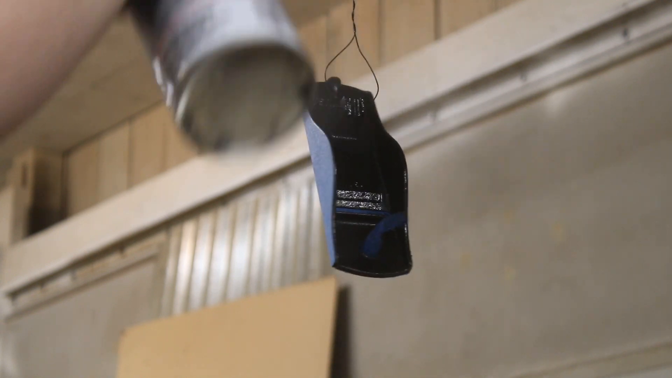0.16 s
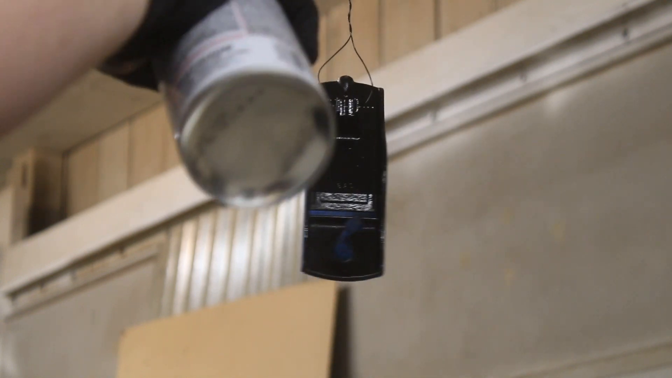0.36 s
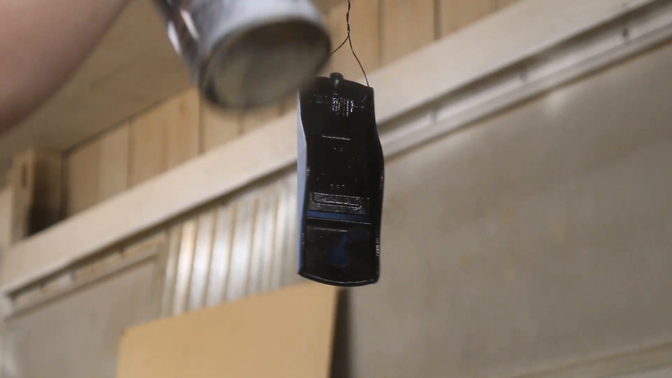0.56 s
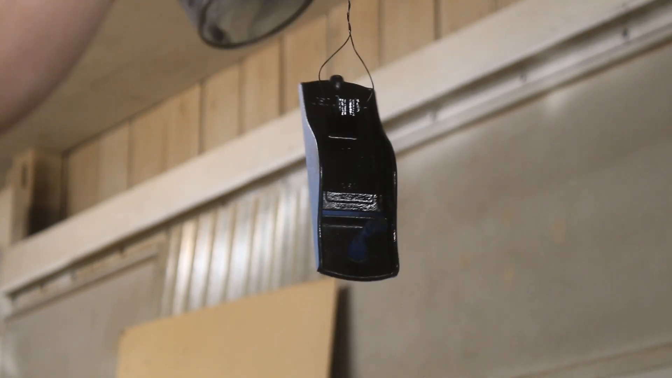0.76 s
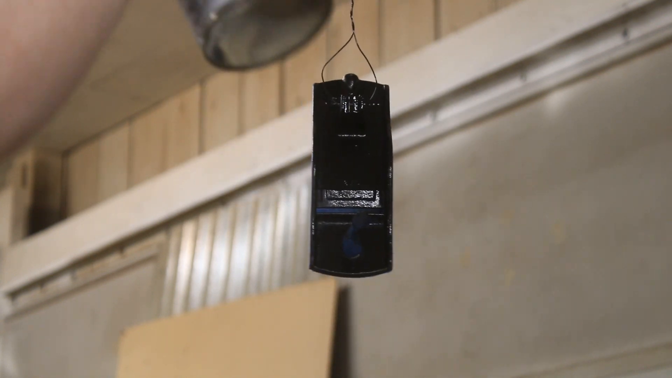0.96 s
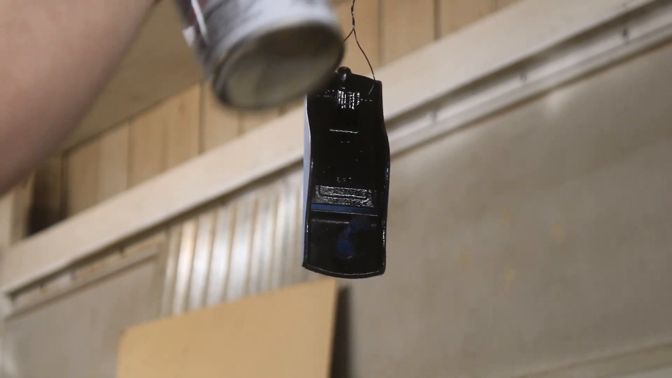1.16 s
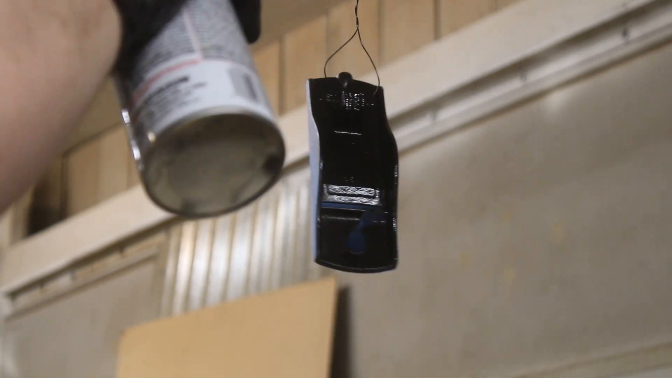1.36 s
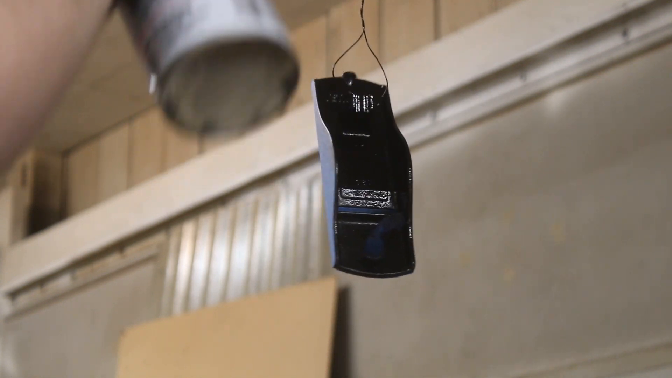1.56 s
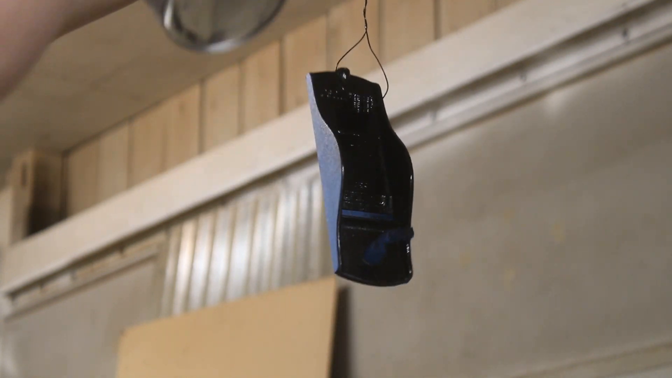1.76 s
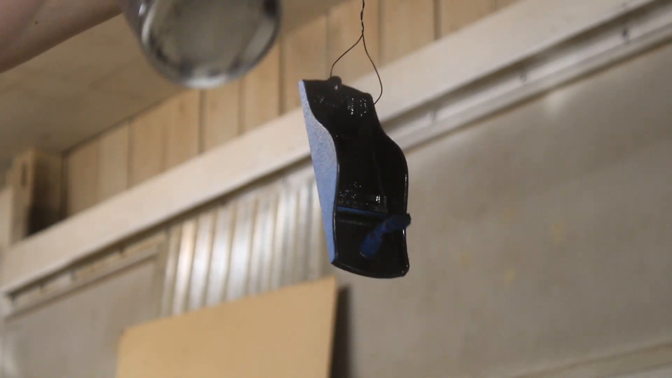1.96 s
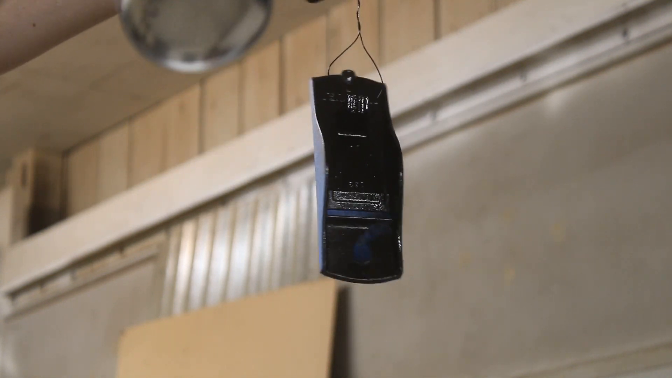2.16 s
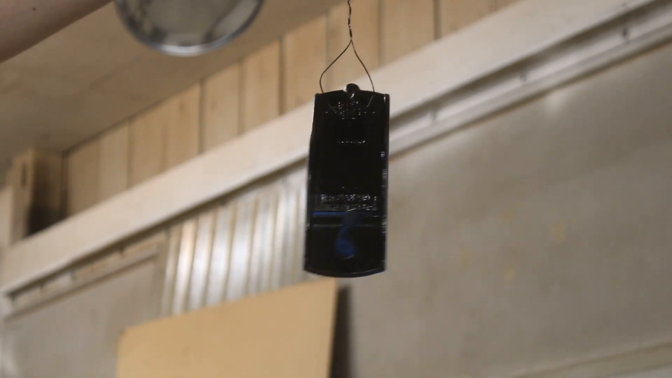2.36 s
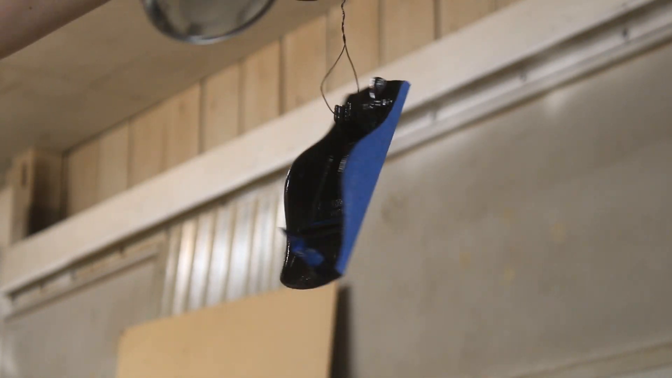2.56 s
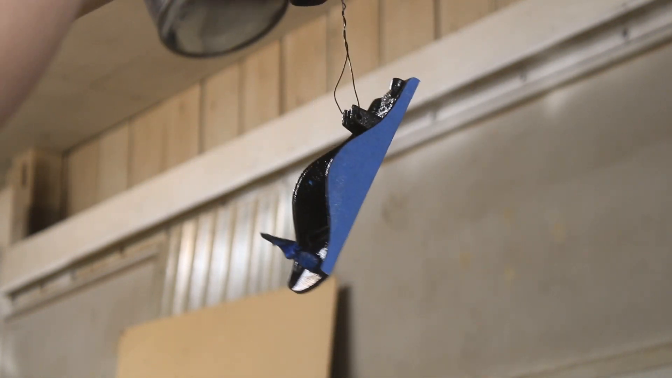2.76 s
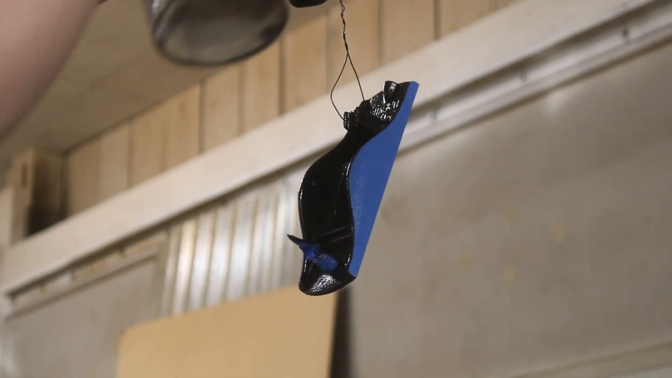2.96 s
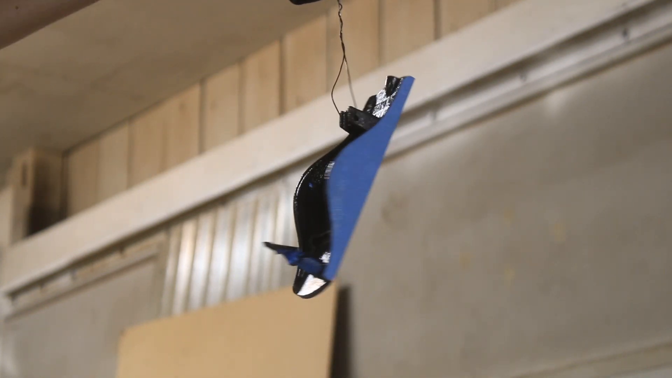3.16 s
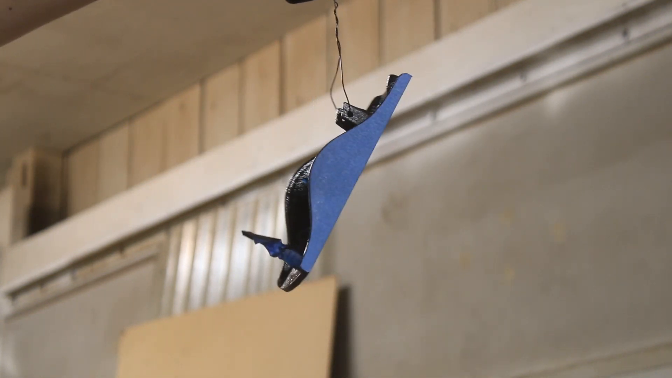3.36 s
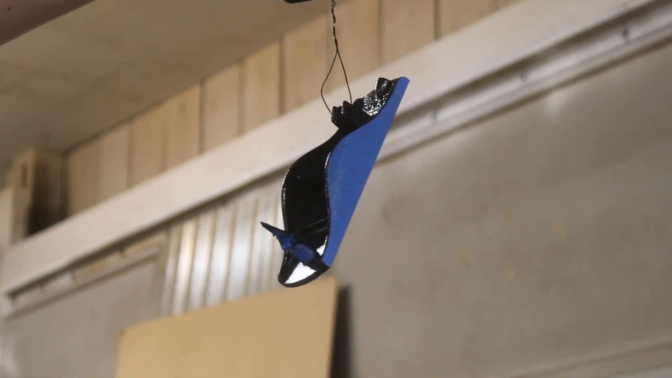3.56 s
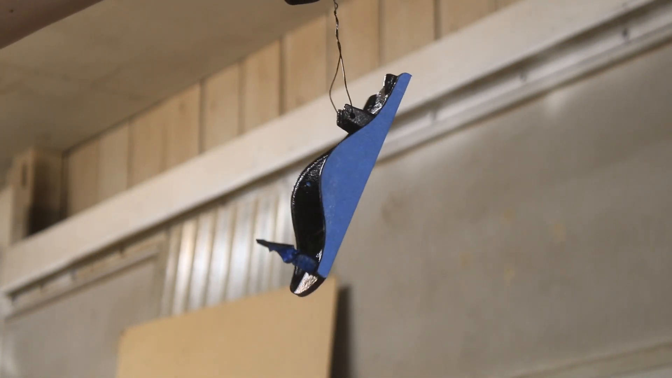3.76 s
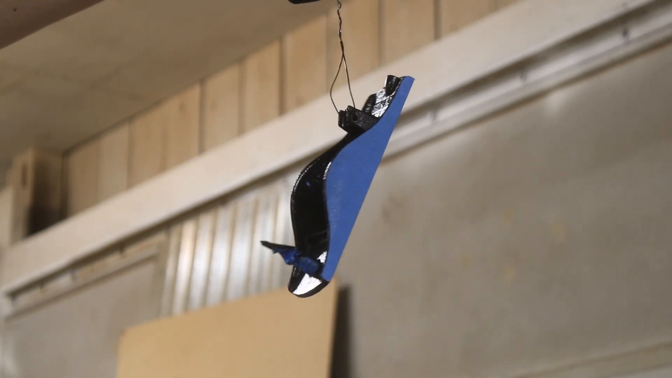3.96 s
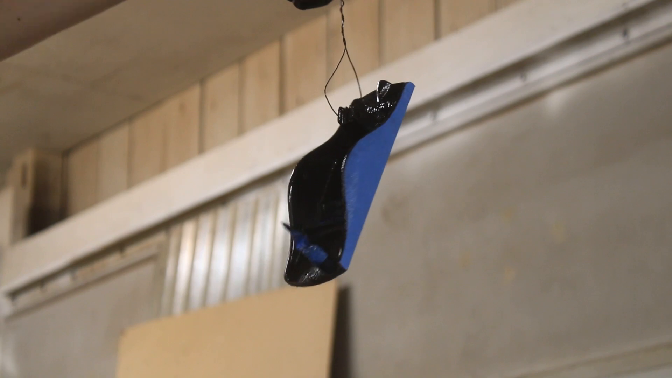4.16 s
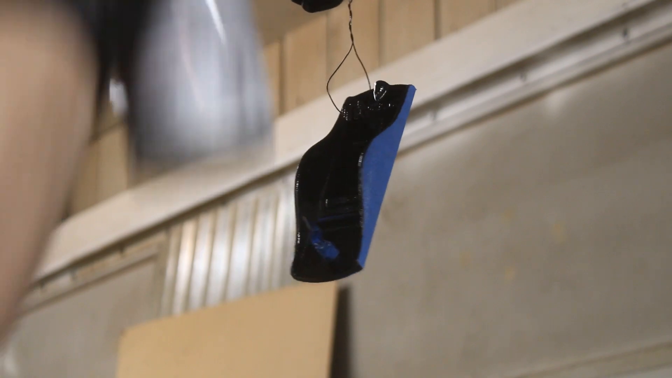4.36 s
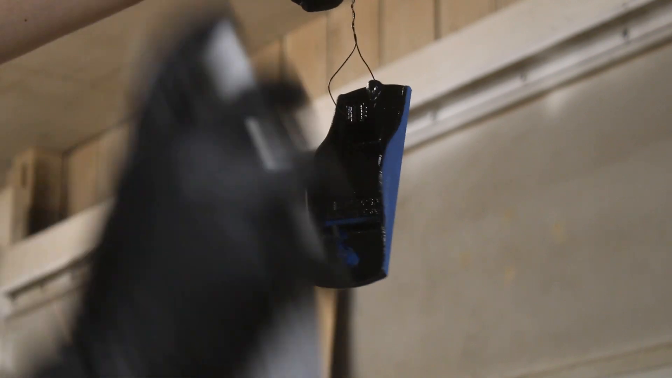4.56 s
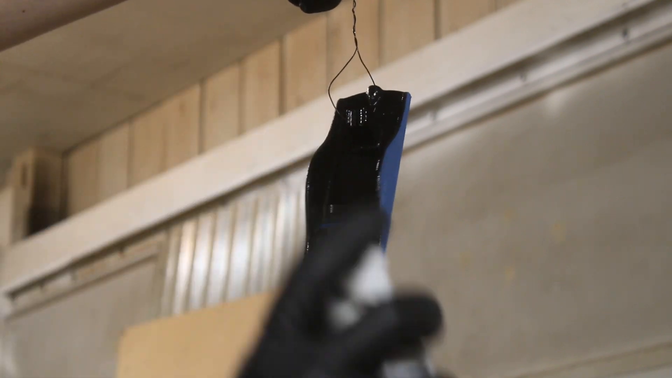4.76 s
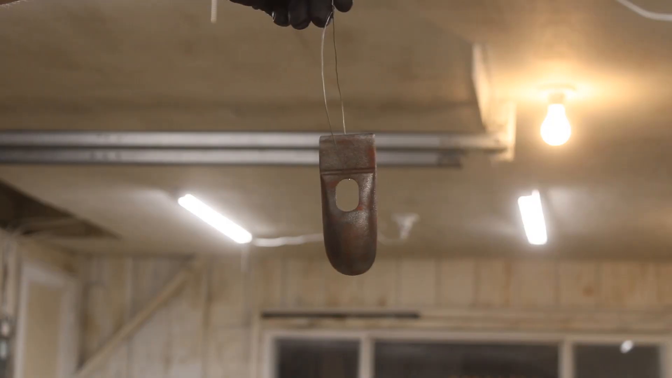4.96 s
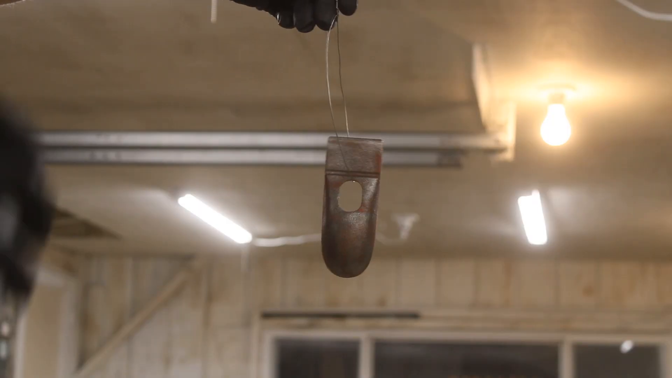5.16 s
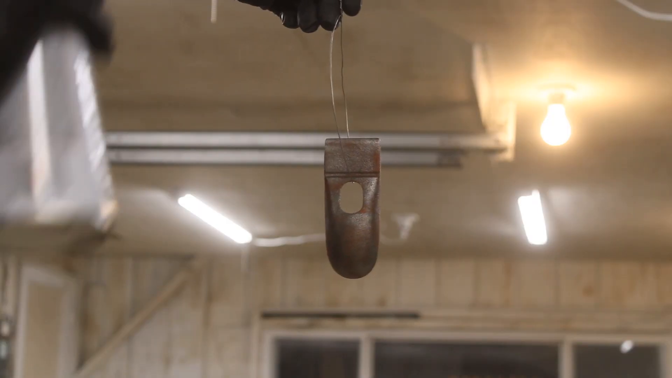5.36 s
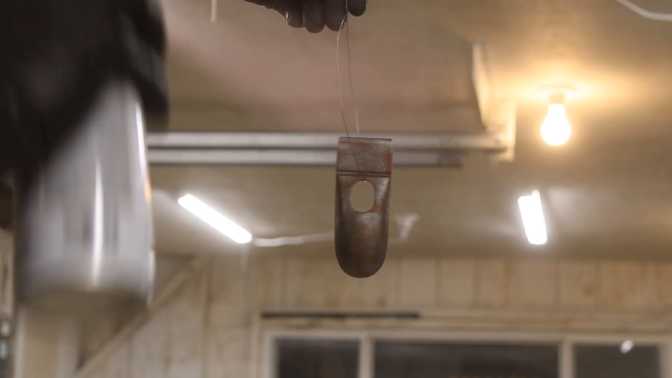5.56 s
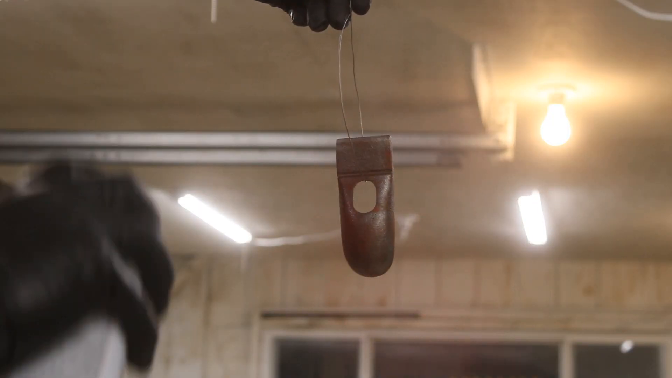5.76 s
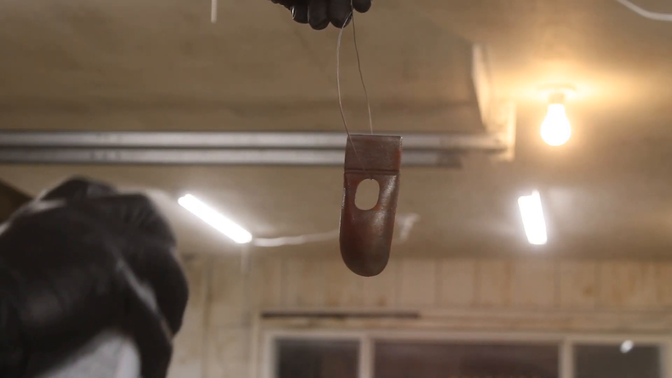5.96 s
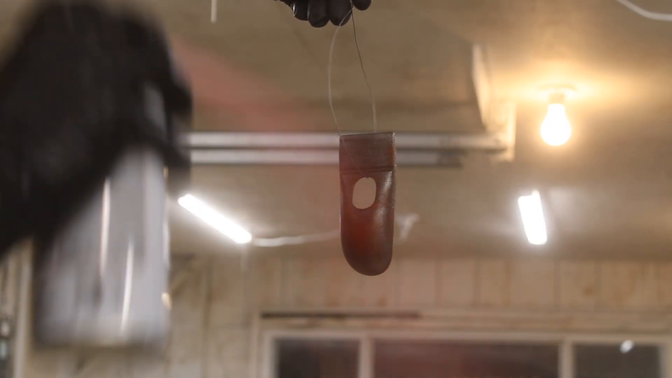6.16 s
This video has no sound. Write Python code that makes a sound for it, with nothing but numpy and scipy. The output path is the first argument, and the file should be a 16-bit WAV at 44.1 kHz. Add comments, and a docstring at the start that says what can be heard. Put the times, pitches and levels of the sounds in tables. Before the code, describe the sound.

Short bursts of spray paint hiss in an echoing workshop, with small metallic ticks and a low fan hum between them.

```python
"""A live, boarded workshop: seven short squirts from an aerosol paint can.
The valve spits as it opens, the jet surges and settles to an even hiss, and the room carries each
burst on; once the jet sweeps past close by. In between, the mixing ball taps the can and a gloved
hand shifts and clicks. Ventilation drones underneath: its motor tones recede, and later a low
electrical hum steps up and stays."""
import sys
import numpy as np
from scipy import signal
from scipy.fft import rfft, irfft
from scipy.io import wavfile

SR = 44100
rng = np.random.default_rng(int(sys.argv[2]) if len(sys.argv) > 2 else 0)


def unload_audio(sound):
    """Save the sound as a 16-bit wav file, at the path given as the first command line argument."""
    columns = np.transpose(np.atleast_2d(sound))
    # keep every value between -1 and 1, then stretch to whole-number steps
    steps = np.round(np.clip(columns, -1, 1) * 32767)
    wavfile.write(sys.argv[1], SR, steps.astype(np.int16))


N = 274302
TIME = np.arange(N) / SR


def turbulent_jet(swell_db=9.0, sputter_db=1.14, flutter_db=0.84):
    """Turbulent gas and paint hiss, coloured by narrow fixed-pitch resonances."""
    # colour of the turbulence: frequency_hz, density_db
    turbulence = [(200, -16.5), (500, -13), (1000, -15), (1600, -8.5), (2300, -5), (3100, -8), (4000, -3),
                  (5500, 0.5), (7200, 5.5), (8300, 2.5), (9500, -3.5), (12000, -14), (14000, -21),
                  (15500, -33)]
    # narrow resonances, relative to the turbulence: pitch_hz, width_hz, level_db
    resonances = [(870, 50, -31.5), (1340, 140, -30), (1810, 160, -27), (2239, 38, -21.5),
                  (2416, 31, -22.5), (2620, 33, -20), (2770, 60, -21), (3447, 180, -21.5), (4285, 75, -22),
                  (5200, 130, -18), (5900, 200, -35), (6880, 110, -20), (7170, 120, -15.5),
                  (7650, 190, -13.5), (8360, 160, -27)]
    jet = noise(turbulence)
    for hz, width_hz, level_db in resonances:
        tone = resonate(rng.standard_normal(N), hz, width_hz)
        swell = from_db(swell_db * np.tanh(drift(28)))   # each one swells and fades on its own
        jet += from_db(level_db) * rms_one(tone * swell)
    droplets = from_db(sputter_db * drift(710) + flutter_db * drift(30))   # they break the stream
    return rms_one(jet) * droplets


def spray(hiss_db=-40.5, surge_s=0.039, shut_s=0.013, pass_s=5.606, pass_half_s=0.057, pass_db=7.5):
    """Gas gathered in the stem leaves with a surge; then the can's pressure holds a steady hiss."""
    # presses of the nozzle: open_s, close_s, surge_db, rise_s, tilt_db_per_octave
    presses = [(0.069, 0.246, 5.5, 0.017, -0.44), (0.417, 0.621, 6, 0.011, 0.15),
               (1.205, 1.334, 8, 0.025, -0.2), (1.901, 2.013, 11, 0.045, -0.35),
               (3.448, 3.574, 5.5, 0.018, -0.5), (5.522, 5.723, 3, 0.011, -0.35),
               (6.051, 6.26, 8.5, 0.03, 0)]
    spectrum = rfft(turbulent_jet())
    octaves = np.log2(np.maximum(np.fft.rfftfreq(N, 1 / SR), 500) / 6000)   # tilt pivots at 6 kHz
    out = np.zeros(N)
    for open_s, close_s, surge_db, rise_s, tilt_db in presses:
        age = np.maximum(TIME - open_s, 0)
        opening = np.minimum(age / rise_s, 1)
        closing = np.exp(-np.clip((TIME - close_s) / shut_s, 0, 20))
        level_db = hiss_db + surge_db / (1 + (age / surge_s) ** 7.2)
        hiss = irfft(spectrum * from_db(tilt_db * octaves), N)
        out += opening * closing * from_db(level_db) * hiss
    facing = 1 / (1 + np.abs((TIME - pass_s) / pass_half_s) ** 5.8)   # the jet sweeps past close by
    return out * from_db(pass_db * facing)


def valve_spits(splash_db=-10.5):
    """Paint rings the nozzle cavity, with a broad splash around it."""
    # wet spits as the valve cracks open or snaps shut: start_s, level_db, pitch_hz, width_octaves
    spits = [(0.071, -43, 2870, 1), (0.418, -49, 2900, 0.69), (1.210, -38.5, 2690, 0.16),
             (1.916, -39.5, 2980, 0.79), (3.451, -39, 2850, 0.2), (5.513, -39, 2460, 0.9),
             (5.718, -42.5, 2840, 0.17), (6.054, -40, 2690, 0.15)]
    out = np.zeros(N)
    for start_s, level_db, hz, octaves in spits:
        cavity = puff(start_s, hz, octaves, t60_s=0.11)
        splash = from_db(splash_db) * puff(start_s, hz, octaves=2.06, t60_s=0.2)
        out += from_db(level_db) * (cavity + splash)
    return out


def mixing_ball(ring_db=-12.0, tick_db=-13.5, blur_hz=95):
    """The ball lands with a tiny rattle and paint sloshes on the wall, so every mode rings roughly."""
    # ball against the can wall: start_s, level_db
    taps = [(0.372, -44.5), (0.92, -56), (0.962, -49), (2.669, -47), (3.254, -46.5), (3.355, -64),
            (3.845, -47), (3.897, -58)]
    # modes of the can: pitch_hz, level_db, t60_s
    modes = [(3400, -6, 0.2), (3577, -1, 0.22), (5480, -10.5, 0.16), (6020, -7, .1), (6500, -7, 0.16),
             (7060, -13, 0.094), (8720, -10.5, 0.17)]
    can_body = [(hz, db, blur_hz / (hz * np.log(2)), t60_s) for hz, db, t60_s in modes]
    out = np.zeros(N)
    for start_s, level_db in taps:
        ring = from_db(ring_db) * strike(start_s, can_body)
        tick = from_db(tick_db) * puff(start_s, hz=5300, octaves=1.0, t60_s=0.12)
        out += from_db(level_db) * (ring + tick)
    return out


def handling(snap_s=4.168, snap_db=-40.5, click_octaves=1.1, rolloff_hz=10500):
    """Dry clicks, hollow knocks and one sharp snap, with the top treble rolled off."""
    # fingers on the can: start_s, level_db, pitch_hz, t60_s
    finger_clicks = [(2.583, -58, 8000, 0.02), (4.093, -60.5, 7140, 0.05), (4.521, -46, 9440, 0.009),
                     (4.654, -51, 5070, 0.05), (4.68, -51.5, 2200, 0.032), (4.811, -49, 3400, 0.041)]
    # hollow knocks: start_s, level_db
    knock_hits = [(2.208, -57), (2.254, -64), (4.658, -59)]
    # ring of a knock: pitch_hz, level_db, width_octaves, t60_s
    knock_body = [(1410, 1.5, 0.17, 0.19), (2880, -0.5, 1, 0.17)]
    # ring of the snap: pitch_hz, level_db, width_octaves, t60_s
    snap_body = [(2580, -2, 1.9, 0.023), (4200, -1.5, 0.16, 0.025), (6800, -3.5, 0.22, 0.021)]
    clicks = sum(from_db(db) * puff(s, hz, click_octaves, t60_s) for s, db, hz, t60_s in finger_clicks)
    knocks = sum(from_db(db) * strike(s, knock_body) for s, db in knock_hits)
    snap = from_db(snap_db) * strike(snap_s, snap_body)
    return butterworth(clicks + knocks + snap, 4, rolloff_hz, "low")


def glove_rub(grip_db=-70, grain_db=0.5):
    """Glove and sleeve rub with each arm movement; the grip rustles faintly in between."""
    # colour of the rubbing: frequency_hz, density_db
    colour = [(600, 0.5), (1100, -3.5), (1400, -1.5), (1900, -5.5), (3000, 2), (3600, -1.5), (4350, 2),
              (5400, -0.5), (6500, 0.5), (7200, -0.5), (7950, -2), (8600, -5.5), (15000, -30)]
    # arm movements: middle_s, half_duration_s, peak_db
    strokes = [(1.048, 0.15, -68), (1.873, 0.064, -68), (3.32, 0.17, -67), (4.52, 0.11, -66.5),
               (4.726, 0.12, -61.5), (5.328, 0.07, -70)]
    stroke_power = sum(from_db(db) ** 2 * np.exp(-((TIME - s) / half_s) ** 2)
                       for s, half_s, db in strokes)
    rustle = rms_one(noise(colour) * from_db(grain_db * drift(60)))
    return np.sqrt(from_db(grip_db) ** 2 + stroke_power) * rustle


def workshop_reverb(x, gap_s=0.004, build_s=0.0059):
    """Dense reflections from boards and benches build up and die away, the treble first."""
    # decay of the room: frequency_hz, t60_s
    decays = [(300, 1), (2000, 0.85), (5500, 0.72), (8000, 0.58), (11000, 0.55), (15000, 0.31)]
    age = TIME[:SR]
    hz = np.fft.rfftfreq(SR, 1 / SR)
    white = rfft(rng.standard_normal(SR))
    tail = np.zeros(SR)
    for centre_hz, t60_s in decays:
        band = at_hz([(f, float(f == centre_hz)) for f, _ in decays], hz)
        tail += irfft(white * band, SR) * from_db(-60 * age / t60_s)
    tail *= np.clip((age - gap_s) / build_s, 0, 1)
    return signal.fftconvolve(x, tail / np.sqrt(np.sum(tail ** 2)))[:N]


def ventilation(rumble_db=-56, air_db=-64, split_hz=600, fade_s=2.38, db_per_s=6.5, depth_db=13.5):
    """Air rushes steadily through the duct; the fan motor recedes and the rumble eases a touch."""
    # colour of the draught: frequency_hz, density_db
    colour = [(12, -9), (24, -10), (36, -10), (50, -5.5), (85, 1), (130, 1), (200, -1.5), (330, -7.5),
              (500, -12), (1000, -15), (2500, -19), (7000, -29.5), (10000, -33.5), (15000, -43.5)]
    # fan motor tones before the fade: pitch_hz, level_db
    motor_tones = [(90.9, -64), (128.4, -67), (210.9, -65.5), (254.5, -66.5), (443.3, -76), (484.7, -75.5),
                   (652, -80.5)]
    fade_db = -np.clip((TIME - fade_s) * db_per_s, 0, depth_db)
    draught = noise(colour)
    rumble = from_db(rumble_db + 0.074 * fade_db) * rms_one(butterworth(draught, 1, split_hz, "low"))
    air = from_db(air_db) * rms_one(butterworth(draught, 1, split_hz, "high"))
    motor = sum(hum(hz, db + fade_db) for hz, db in motor_tones)
    return rumble + air + motor


def mains_hum(pitch_hz=59.2, start_db=-73.5, step_s=4.92, step_db=12, rise_s=0.06):
    """A low electrical hum that steps up and stays."""
    step = np.clip((TIME - step_s) / rise_s, 0, 1)
    return hum(pitch_hz, start_db + step_db * step)


def hum(hz, level_db, wander_hz=0.98, waver_db=4.0):
    """A tone that wavers in pitch and level."""
    phase = 2 * np.pi * np.cumsum(hz + wander_hz * drift(3.9)) / SR
    return np.sqrt(2) * from_db(level_db + waver_db * drift(1.6)) * np.sin(phase)


def strike(start_s, body):
    """One blow sets every band of a body ringing."""
    return sum(from_db(db) * puff(start_s, hz, octaves, t60_s) for hz, db, octaves, t60_s in body)


def puff(start_s, hz, octaves, t60_s):
    """A band of noise that starts at once and dies away."""
    edges_hz = np.clip([hz / 2 ** (octaves / 2), hz * 2 ** (octaves / 2)], 20, SR / 2 - 100)
    age = TIME[:SR // 2]
    band = butterworth(rng.standard_normal(SR), 2, edges_hz, "band")[-len(age):]
    burst = rms_one(band) * from_db(-60 * age / t60_s)
    return np.concatenate([np.zeros(round(start_s * SR)), burst, np.zeros(N)])[:N]


def resonate(x, hz, width_hz):
    """One resonance with gain 1 at its peak."""
    r = np.exp(-np.pi * width_hz / SR)
    feedback = [1, -2 * r * np.cos(2 * np.pi * hz / SR), r * r]
    return signal.lfilter(np.array([1, 0, -1]) * (1 - r * r) / 2, feedback, x)


def butterworth(x, order, hz, kind):
    """A smooth low, high or band pass."""
    return signal.sosfilt(signal.butter(order, hz, kind, fs=SR, output="sos"), x)


def noise(colour):
    """Noise of a given colour, rms 1."""
    gain = from_db(at_hz(colour, np.fft.rfftfreq(N, 1 / SR)))
    return rms_one(irfft(rfft(rng.standard_normal(N)) * gain, N))


def drift(rate_hz):
    """Smooth random movement, mostly slower than rate_hz, rms 1."""
    rolloff = 1 + (np.fft.rfftfreq(N, 1 / SR) / rate_hz) ** 2
    return rms_one(irfft(rfft(rng.standard_normal(N)) / rolloff, N))


def at_hz(points, hz):
    """Read (frequency_hz, value) points on a log-frequency axis."""
    f, value = np.transpose(points)
    return np.interp(np.log(np.maximum(hz, 1)), np.log(f), value)


def from_db(db):
    """Decibels to gain."""
    return 10 ** (np.asarray(db) / 20)


def rms_one(x):
    """Scale to unit rms."""
    return x / np.sqrt(np.mean(x ** 2) + 1e-20)


def scene(jet_send_db=-6.5, spit_send_db=-10.5, ball_send_db=-6.0, hand_send_db=-9.5):
    """Can and hand close by, the workshop around them."""
    jet, spit, ball = spray(), valve_spits(), mixing_ball()
    hand = handling() + glove_rub()
    room = workshop_reverb(from_db(jet_send_db) * jet + from_db(spit_send_db) * spit
                           + from_db(ball_send_db) * ball + from_db(hand_send_db) * hand)
    return (jet + spit + ball + hand + room + ventilation() + mains_hum())[None]


def record(dry, cutoff_hz=15500):
    """A steep low-pass takes off the very top."""
    return signal.sosfilt(signal.ellip(10, .1, 80, cutoff_hz, fs=SR, output="sos"), dry)


dry = scene()
out = record(dry)
unload_audio(out)
```